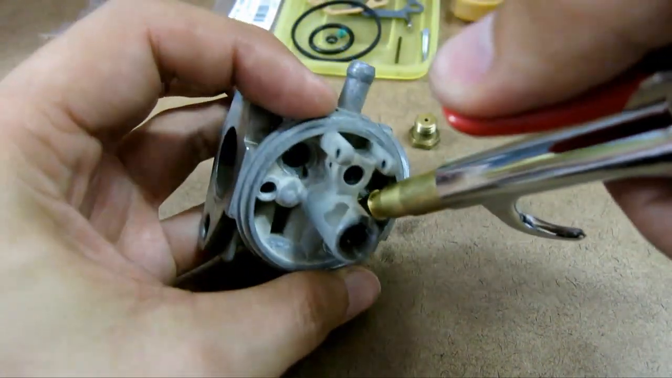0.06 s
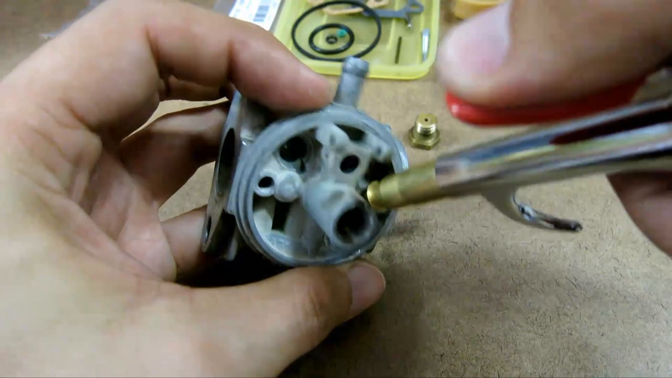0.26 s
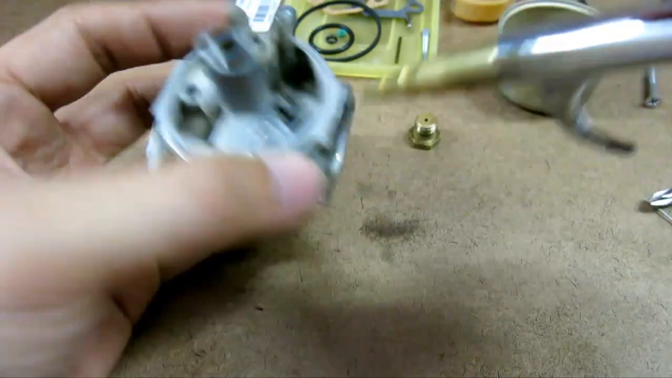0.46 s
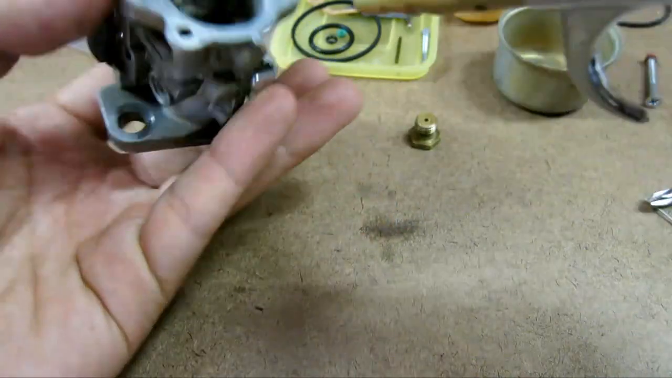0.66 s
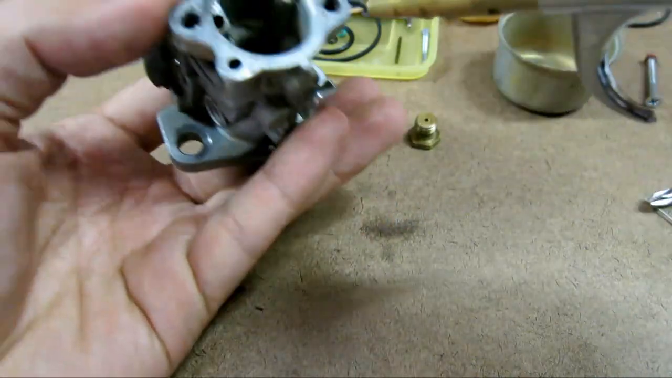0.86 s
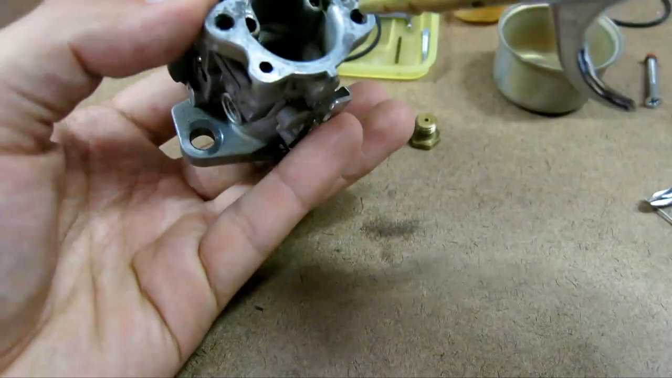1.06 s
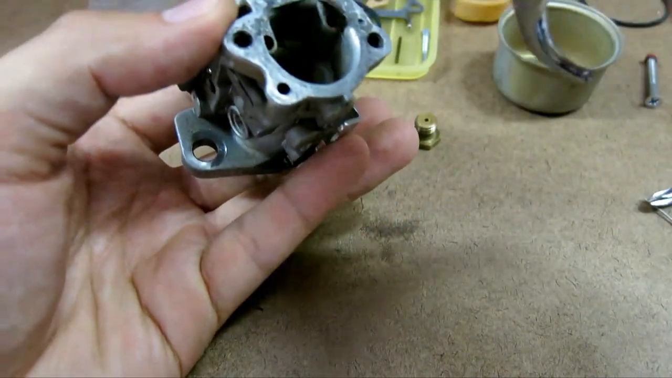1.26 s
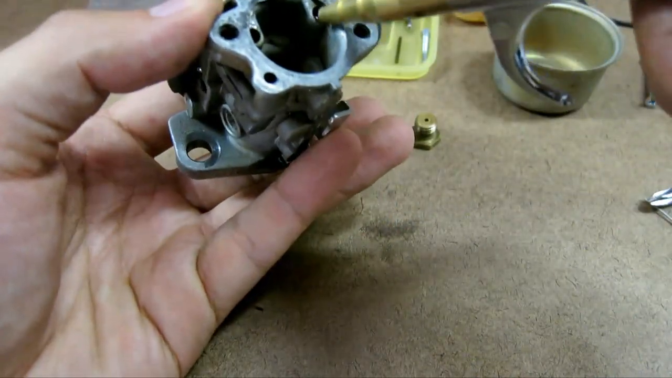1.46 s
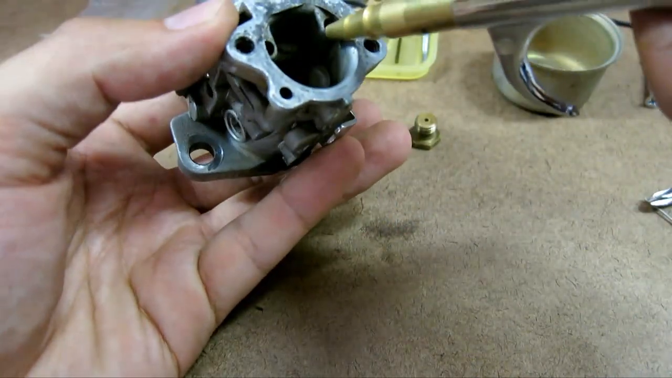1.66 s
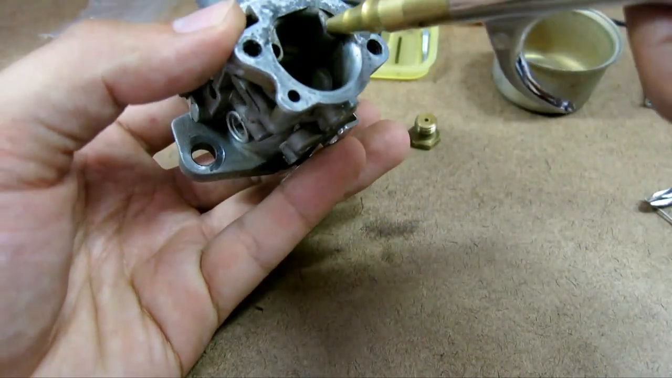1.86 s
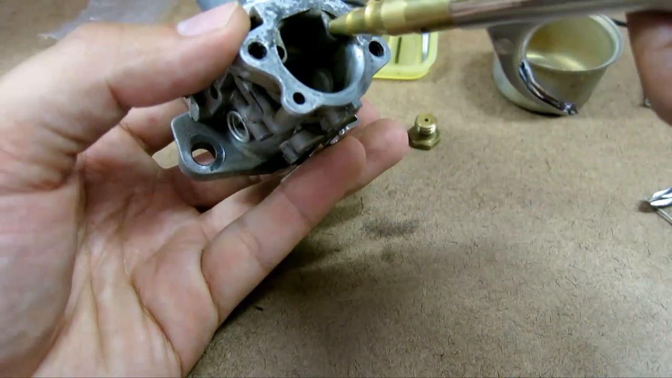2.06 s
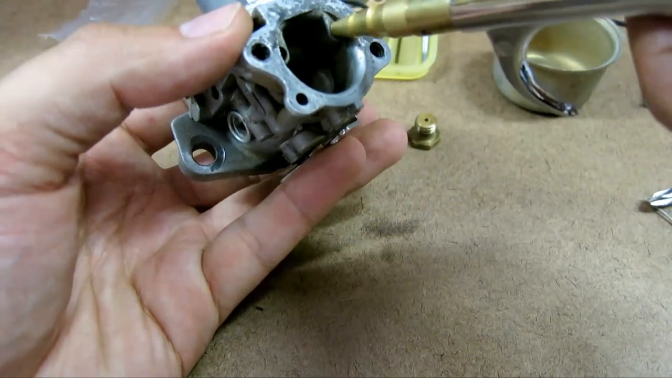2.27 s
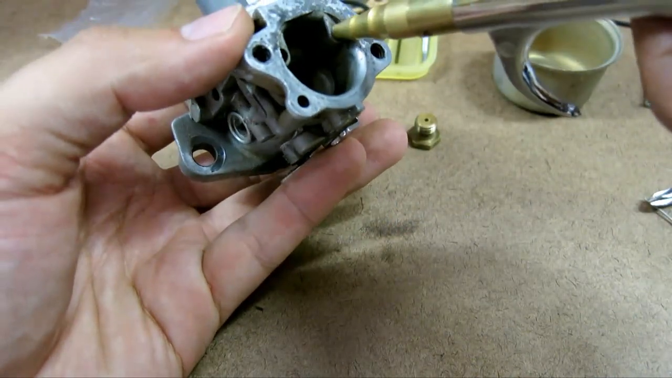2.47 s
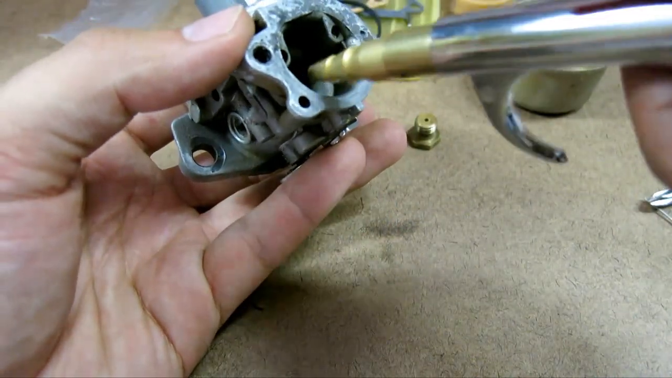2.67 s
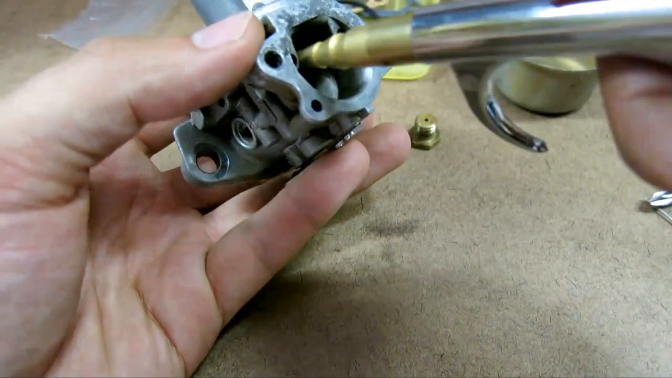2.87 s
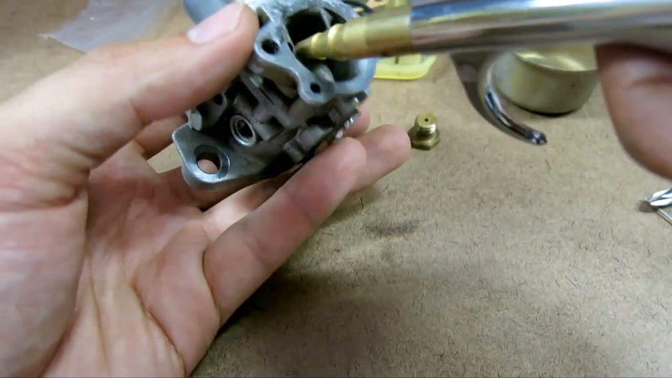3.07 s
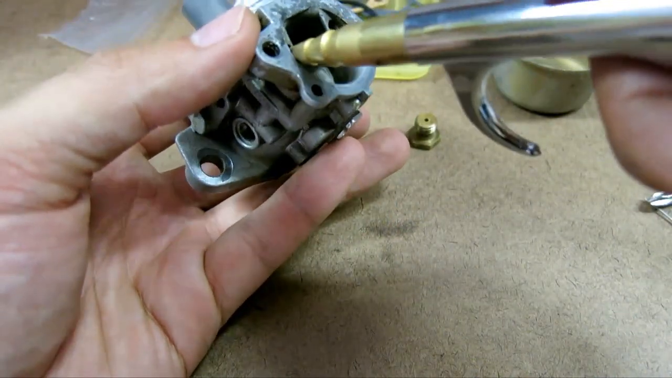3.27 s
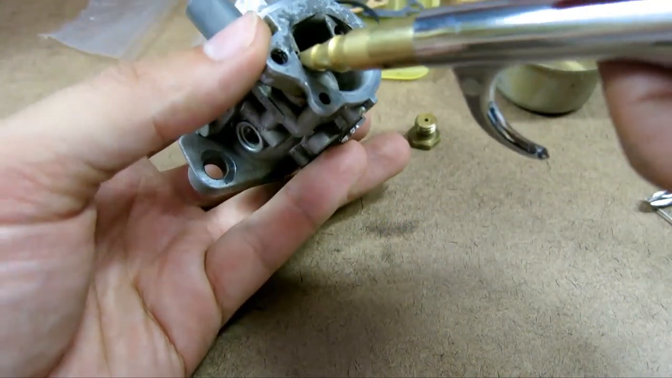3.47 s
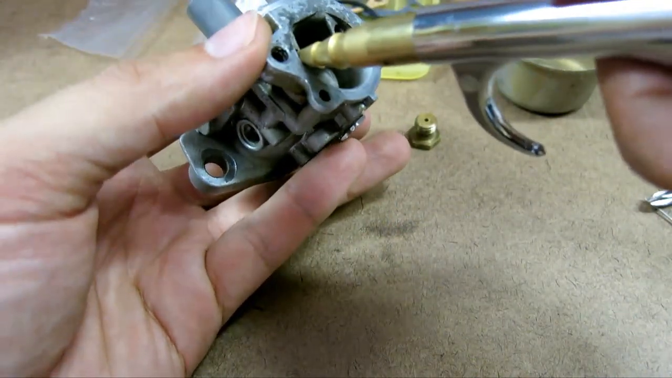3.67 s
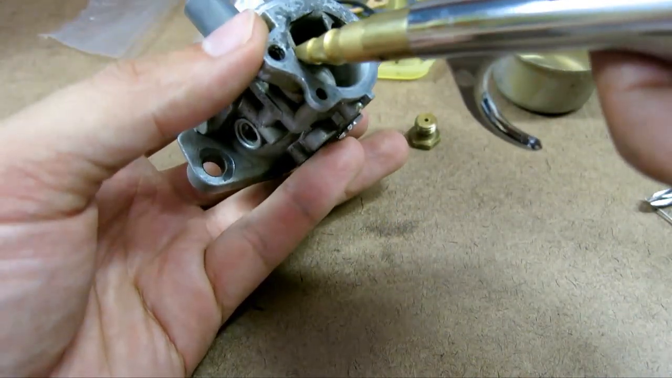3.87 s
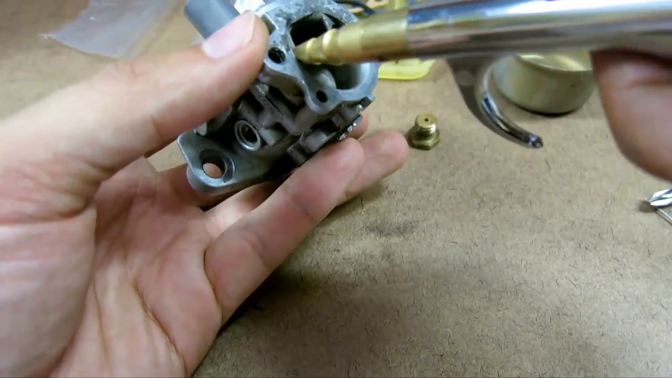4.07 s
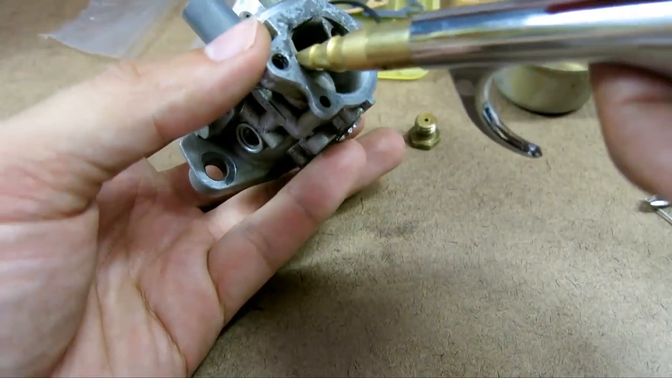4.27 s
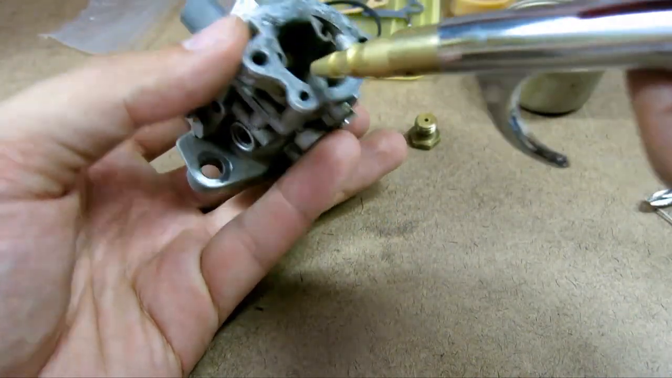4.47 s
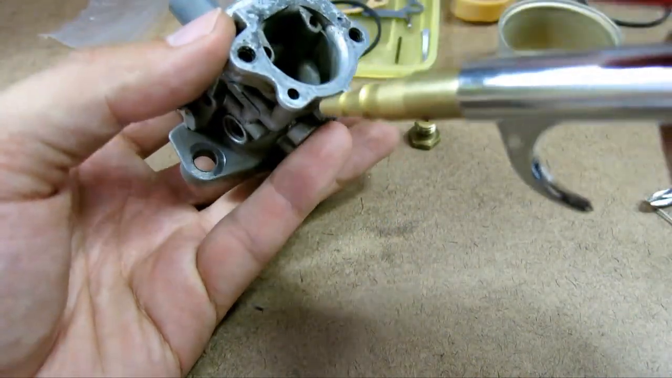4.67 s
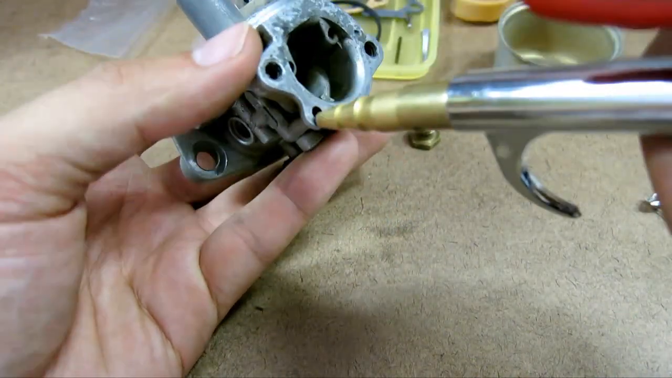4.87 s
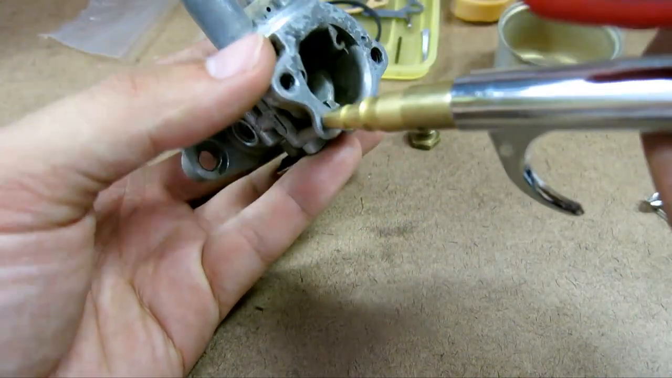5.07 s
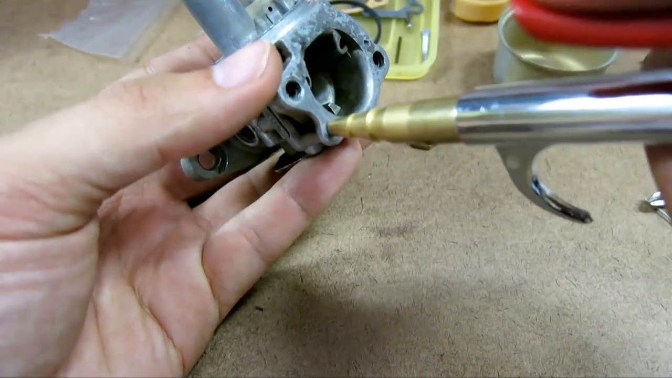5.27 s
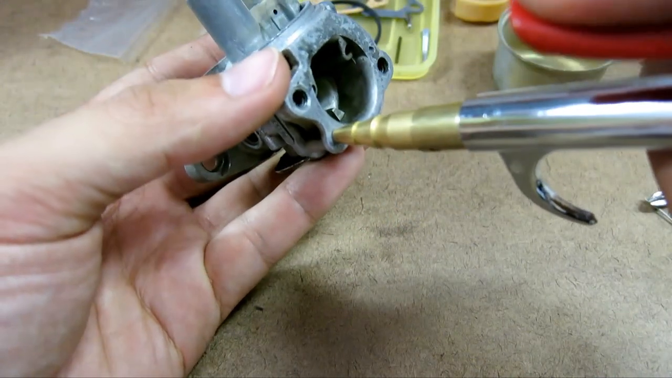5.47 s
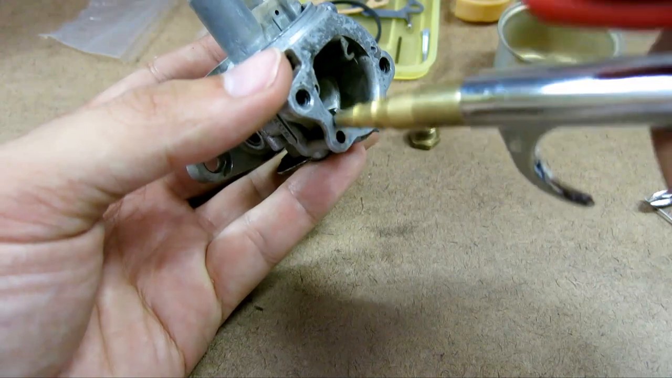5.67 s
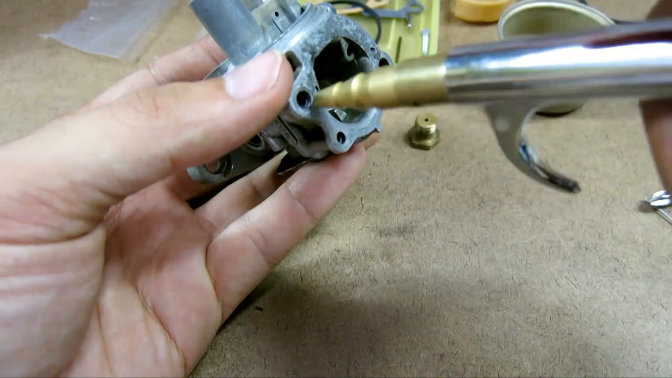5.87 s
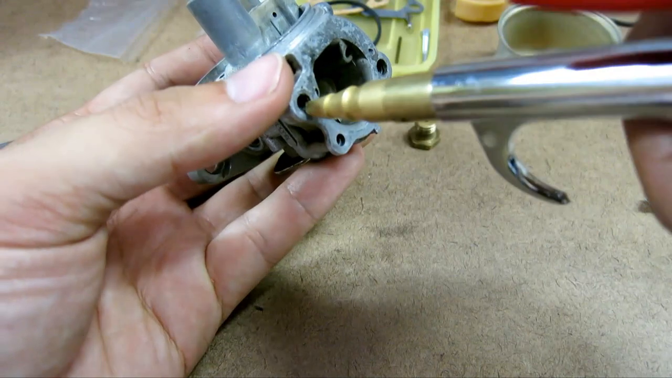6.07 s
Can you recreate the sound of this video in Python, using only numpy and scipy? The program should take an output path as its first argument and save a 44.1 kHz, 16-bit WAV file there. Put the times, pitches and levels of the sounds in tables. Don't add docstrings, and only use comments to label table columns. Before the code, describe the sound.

Bright, forceful air hisses come in brief groups: one, two faint, four quick, three hard, then a final pair. Each swells and cuts off within about a tenth of a second, thin and whistling at low flow, broad and rough at full flow, with a short room tail. Between them a brass tip clicks, rings and scrapes on a small metal casting, close up. Faint hum and room air lie beneath.

```python
import sys
import numpy as np
from scipy import signal
from scipy.fft import rfft, irfft, next_fast_len
from scipy.io import wavfile
from scipy.ndimage import uniform_filter1d, map_coordinates

SR = 44100
rng = np.random.default_rng(int(sys.argv[2]) if len(sys.argv) > 2 else 0)


def persist_wave(psi):
    counts = np.round(np.clip(psi, -1, 1) * 32767).astype(np.int16)
    wavfile.write(sys.argv[1], SR, np.atleast_2d(counts).T)


def boost_factor(decibels):
    exponent = np.asarray(decibels, float) / 20
    return 10 ** exponent


N = 269892
T = np.arange(N) / SR
HIT_T = np.arange(SR // 6) / SR

# frequency in Hz, side minus mid in dB.
WIDTH = [(300, -19), (2000, -18), (4000, -24.5), (8500, -24), (10000, -15), (13000, -13), (15500, -10)]
# frequency in Hz, level in dB, T60 in seconds.
CASTING = [(8705, -19, 0.076), (9356, -14, 0.052), (9846, -24, 0.078), (10100, -14, 0.11),
           (10730, -3, 0.068), (11080, 0, 0.082), (12860, -5, 0.092), (13640, -34, 0.13),
           (14390, -18, 0.092), (15020, -17, 0.078), (15670, -19, 0.11)]
# frequency in Hz, level in dB.
CRACK = [(800, -2.5), (1800, -4), (3000, 3.5), (5000, -4), (7000, 2), (11000, -9), (13500, -11.5),
         (16000, -22)]


def unit(x):
    return x / np.sqrt(np.mean(x ** 2) + 1e-20)


def along(points, hz):
    f, v = np.transpose(points)
    return np.interp(np.log(hz + 1), np.log(f + 1), v)


def curve(points):
    return lambda hz: boost_factor(along(points, hz))


def peaks(modes, hz):
    power = 0
    for centre, width, db in modes:
        damped = (hz * width) ** 2
        power = power + boost_factor(db) ** 2 * damped / ((centre * centre - hz * hz) ** 2 + damped)
    return np.sqrt(power)


def steep(modes, hz, order=2):
    return np.sqrt(sum(boost_factor(db) ** 2 * peaks([(c, w, 0)], hz) ** (2 * order) for c, w, db in modes))


def filtered(x, gain):
    m = next_fast_len(x.shape[-1] + 8192)
    return irfft(rfft(x, m) * gain(np.fft.rfftfreq(m, 1 / SR)), m)[..., :x.shape[-1]]


def noise(gain, count=N):
    return unit(filtered(rng.standard_normal(count), gain))


def wobble(rate):
    return map_coordinates(rng.standard_normal(int(N * rate / SR) + 4), [T * rate])


def gate(start, end, slope_db):
    outside_s = np.clip(np.maximum(start - T, T - end), 0, None)
    return boost_factor(-slope_db * outside_s)


def gain_control():
    # time in seconds, room level in dB.
    pulls = [
        (0, -68),
        (0.22, -76.5),
        (2.41, -72),
        (3.59, -73.5),
        (3.81, -74),
        (4.06, -75.5),
        (5.59, -76.5),
    ]
    recover_db_per_s, duck_s = 5.5, 0.06
    s, db = np.transpose(pulls)
    last = np.maximum(np.searchsorted(s, T) - 1, 0)
    level_db = db[last] + recover_db_per_s * (T - s[last])
    return boost_factor(uniform_filter1d(level_db, round(duck_s * SR)))


def workshop():
    # frequency in Hz, width in Hz, level in dB.
    machine_modes = [(58.7, 20, -6), (122, 27, -3.5), (155, 21, -4.5), (211, 19, -6.5), (345.9, 5.1, -11)]
    # frequency in Hz, level in dB.
    mains_lines = [(119.5, 3.5), (155.5, -2), (646, -8)]
    # frequency in Hz, level in dB per Hz.
    air_mid = [(25, -35), (43, -17.5), (123, -13.5), (217, -12), (340, -17), (775, -22.5), (1500, -28),
               (3500, -41.5), (5000, -40), (7000, -40), (8000, -38.5), (9000, -42.5), (12000, -44.5),
               (12800, -63.5), (14000, -87)]
    # frequency in Hz, level in dB per Hz.
    air_side = [(25, -22.5), (64, -5), (300, -6.5), (800, -12.5), (1650, -20), (3000, -37.5), (6000, -48.5),
                (12000, -59), (13500, -89.5)]
    mid = boost_factor(1) * noise(curve(air_mid))
    mid += boost_factor(2) * noise(lambda hz: steep(machine_modes, hz))
    for hz, db in mains_lines:
        drift = 0.7 * wobble(5)
        mid += boost_factor(db + 1.2 * wobble(4.3)) * np.sin(2 * np.pi * hz * T + drift)
    side = boost_factor(9.5) * noise(curve(air_side))
    return gain_control() * np.array([mid, side])


def valve(t, squeezes, surge_db):
    open_power, shut_power = 2.6, 2.8
    surge_s = 0.016
    choke_at_db, choke_db = -28.8, 3.8

    def travel(start, end):
        return np.clip((t - start) / (end - start), 1 / 100, 1)

    power, surge = 0, 0
    for crack, wide, let_go, shut, db in squeezes:
        pressure = boost_factor(db) * travel(crack, wide) ** open_power * travel(shut, let_go) ** shut_power
        power = power + pressure ** 2
        surge = surge + surge_db * np.exp(-abs(t - wide) / surge_s)
    flow_db = 10 * np.log10(power)
    return flow_db + choke_db * (1 + np.tanh(flow_db - choke_at_db)) / 2, surge


def halves(x):
    def level(lo, hi):
        return filtered(x[0], lambda hz: 1.0 * (hz > lo) * (hz < hi)).std()

    lower = filtered(x, lambda hz: 1 / (1 + (hz / 8600) ** 10))
    return np.array([lower / level(3500, 8000), (x - lower) / level(9000, 16000)])


def low_pass(cutoff):
    return lambda hz: 1 / (1 + (hz / cutoff) ** 4)


def jet():
    # valve cracks, fully open,
    # let go and shut in seconds, hiss level in dB.
    trigger = [
        [(0.083, 0.146, 0.253, 0.288, -26)],
        [(1.657, 1.709, 1.753, 1.801, -53), (1.723, 1.745, 1.79, 1.836, -32.5)],
        [(1.928, 2.008, 2.045, 2.118, -28.7), (2.129, 2.16, 2.269, 2.307, -33.9),
         (2.111, 2.201, 2.238, 2.26, -30.5), (2.31, 2.363, 2.43, 2.479, -23.8)],
        [(3.488, 3.532, 3.598, 3.674, -23.5), (3.718, 3.784, 3.828, 3.913, -23.7),
         (3.928, 4.005, 4.08, 4.147, -23.3)],
        [(5.291, 5.339, 5.392, 5.48, -28.4)],
        [(5.483, 5.545, 5.619, 5.668, -23.6)],
    ]
    # frequency in Hz, width in Hz, level in dB.
    cavities = [
        [(2400, 2500, -7.5), (5340, 2500, -3.5), (8700, 2300, 0.5), (10900, 3000, -7), (14200, 3000, -5)],
        [(690, 1500, -27), (2460, 900, -10.5), (5060, 410, -13), (6020, 710, -11.5), (10030, 520, 10.5),
         (13040, 2000, 5), (15400, 900, -4)],
        [(700, 1000, -21), (2490, 1900, -12.5), (5070, 2000, -8.5), (7500, 1700, -5), (9990, 1500, -5.5),
         (12340, 3000, 0.5), (15290, 1300, -4)],
        [(729, 1500, -30), (2530, 2000, -19), (5220, 1640, -9.5), (7600, 5600, -12.5), (10800, 1200, 1.5),
         (13160, 1500, -2.5), (14700, 1600, -6)],
        [(620, 580, -22), (3300, 3900, -13), (5040, 2800, -6.5), (7500, 2600, -6), (10300, 2200, -13),
         (12300, 1200, 4), (15240, 1180, -5)],
        [(1500, 3600, -20), (3300, 1050, -13), (4770, 2700, -4.5), (7750, 4300, 1.5), (11140, 1500, 1.5),
         (12660, 2200, 3.5), (15060, 2400, -2.5)],
    ]
    # room send in dB, level where half turbulent in dB,
    # lower hiss in dB, opening surge in dB, pipe stretch as a ratio.
    seats = [
        (-13, -25.5, -5, 2.9, 1.0),
        (-29, -62.5, -10.5, -2.5, 1.01),
        (-27, -23, -9, 0.6, 1.0),
        (-25.5, -32, -11.5, 1.4, 1.045),
        (-23, -63, -4, -1.8, 1.015),
        (-19.5, -38, -7, 1.2, 1.03),
    ]
    # frequency in Hz, width in Hz, level in dB.
    pipe = [(600, 1400, -28), (2454, 1800, -9.5), (5080, 1200, -4.5), (5860, 1600, -7.5),
            (7600, 1400, -7.5), (10054, 1400, -0.5), (12070, 1100, -2.5), (12900, 920, 1),
            (15600, 1000, -7.5)]
    # time in seconds, lift in dB.
    squeals = [(1.815, 5), (1.986, 8.5), (2.069, 9.5), (2.154, 4.5), (2.339, 7), (2.452, 4), (3.54, 4.5),
               (3.753, 7), (3.784, 4), (3.865, 5), (3.965, 5), (5.32, 3), (5.354, 3.5), (5.422, 6),
               (5.513, 3), (5.541, 3)]
    # frequency in Hz, level in dB per Hz.
    far_colour = [(300, -32), (1500, -22), (3800, -16.5), (4800, -5), (8000, -4), (11000, -1.5),
                  (14000, -6), (16000, -8)]
    squeal_s, turbulence_lag_s = 0.004, 0.018
    sing_at_db, sing_range_db, sing_db = -42, 3.7, 2.4
    lower_surge, lower_lingers = 2.9, 0.09
    bass_lingers, bass_hz = 0.22, 2300

    out, send = np.zeros((2, N)), np.zeros(N)
    squeal_db = sum(db * np.exp(-((T - s) / squeal_s) ** 2) for s, db in squeals)
    for squeezes, cavity, seat in zip(trigger, cavities, seats):
        send_db, full_db, lower_db, surge_db, stretch = seat
        span = slice(round(squeezes[0][0] * SR), round(squeezes[-1][3] * SR))
        t = T[span]
        flow_db, surge = valve(t, squeezes, surge_db)
        singing = sing_db * np.exp(-((flow_db - sing_at_db) / sing_range_db) ** 2)
        level_db = flow_db + surge + singing + squeal_db[span]

        settled_db = np.minimum(level_db, np.interp(t - turbulence_lag_s, t, level_db))
        full = 1 / (1 + np.exp(-(settled_db - full_db) / 2.2))
        white = rng.standard_normal((2, 2, len(level_db)))
        sung = halves(filtered(white[0], lambda hz: steep(pipe, hz / stretch, order=3)))
        blown = halves(filtered(white[1], lambda hz: steep(cavity, hz)))
        lower, upper = np.sqrt(1 - full) * sung + np.sqrt(full) * blown

        shy_db = np.minimum(flow_db.max() - flow_db, 40)
        bass_gain = boost_factor(bass_lingers * shy_db - lower_surge * surge)
        lower += filtered(lower, low_pass(bass_hz)) * (bass_gain - 1)
        below_db = flow_db + lower_db + lower_surge * surge + lower_lingers * shy_db
        out[:, span] += boost_factor(level_db) * upper + boost_factor(below_db) * lower
        send[span] += boost_factor(level_db + send_db)

    out *= boost_factor(0.68 * wobble(60) + 0.92 * wobble(300))
    gurgle = filtered(out[0], low_pass(1500))
    out[0] += gurgle * (boost_factor(4.5 * wobble(45)) - 1)
    lean = filtered(out[0], lambda hz: (0.17 + 0.33j) * hz ** 8 / (hz ** 8 + 9000 ** 8))
    side = lean + filtered(out[1], curve(WIDTH))
    return np.array([out[0], side]), send * noise(curve(far_colour))


def walls(x):
    # frequency in Hz, T60 in seconds.
    decay = [(300, 0.37), (2000, 0.58), (5000, .42), (10000, 0.4), (16000, 0.25)]
    hz, t, z = signal.stft(rng.standard_normal((2, SR // 2)), SR, nperseg=256)
    fading = z * boost_factor(-60 * t / along(decay, hz)[:, None])
    tail = signal.istft(fading, SR, nperseg=256)[1]
    wet = signal.fftconvolve(x[None], tail / np.linalg.norm(tail[0]), axes=1)[:, :N]
    return np.array([wet[0], filtered(wet[1], lambda f: boost_factor(along(WIDTH, f) + 7))])


def draught():
    # start and end in seconds, level in dB, lump depth in dB, # mid level
    # relative to side in dB.
    gusts = [
        (0.163, 0.241, -11.5, 1.5, -14),
        (2.38, 2.427, -39, 6, -6.5),
        (3.551, 3.584, -31, 3, -21.5),
        (3.786, 3.832, -39.5, 2, -22.5),
        (4.019, 4.01, -26, -2, -4.5),
        (4.016, 4.072, -31.5, 4, -9),
        (5.566, 5.613, -22.5, 2, -15.5),
    ]
    # frequency in Hz, level in dB per Hz.
    eddy_colour = [(18, -45), (30, -7), (336, 1.5), (512, -1), (625, -3.5), (714, -4), (1020, -2),
                   (2160, -9.5), (3150, -23), (6000, -30.5), (7800, -61), (13200, -120)]
    push = curve(eddy_colour)
    lumps, out = wobble(70), 0
    shared = noise(lambda hz: push(hz) * (1 + hz / 2500) * hz / (hz + 60))
    opposed = noise(push)
    slow = noise(lambda hz: push(hz) / (1 + (hz / 200) ** 2))
    for start, end, db, lump_db, shared_db in gusts:
        eddies = gate(start, end, slope_db=1502.5) * np.array([boost_factor(shared_db) * shared, opposed])
        wake = boost_factor(-29.5) * (T > end) * gate(start, end, slope_db=250) * slow * [[0.4], [1]]
        out = out + boost_factor(db + lump_db * lumps) * (eddies + wake)
    return out


def burst(gain, t60, rise):
    return noise(gain, count=len(HIT_T)) * boost_factor(-60 * HIT_T / t60) * (1 - np.exp(-HIT_T / rise))


def add(out, s, mid, other, pan_db):
    side = np.tanh(pan_db * np.log(10) / 40) * mid + other
    out[:, round(s * SR):][:, :len(mid)] += [mid, side]


def knocks(out):
    # time in seconds, peak level in dB.
    bumps = [
        (0.554, -62),
        (0.629, -51),
        (0.647, -51.5),
        (1.046, -55.5),
        (4.565, -62),
    ]
    # frequency in Hz, width in Hz, level in dB.
    hollow = [(463, 200, -4.5), (835, 200, 0), (1368, 170, -1.5), (2150, 270, -14)]
    for s, db in bumps:
        mid, other = (burst(lambda f: steep(hollow, f), t60=0.072, rise=0.0012) for _ in range(2))
        add(out, s, boost_factor(db - 1.5) * mid, boost_factor(db - 1) * other, pan_db=-12.5)


def scrapes():
    # start and end in seconds, level in dB, centre frequency in Hz.
    slides = [
        (0.555, .576, -73, 12000),
        (2.92, 2.944, -74, 3500),
        (3.033, 3.048, -70, 3300),
        (3.052, 3.083, -63, 2740),
        (3.103, 3.121, -72, 3300),
        (5.166, 5.175, -68.5, 4000),
        (1.425, 1.447, -74.5, 3500),
        (1.936, 1.935, -57, 3000),
    ]
    out, grain = np.zeros(N), boost_factor(5 * np.tanh(wobble(370)) / 2)
    metal = [(c, 120, 0) for c, *_ in CASTING]
    for start, end, db, hz in slides:
        span = slice(round((start - 0.03) * SR), round((end + 0.036) * SR))
        friction = noise(lambda f: peaks([(hz, 1.3 * hz, 0)], f) ** 3 + boost_factor(-11) * steep(metal, f),
                         count=len(out[span]))
        out[span] += boost_factor(db) * gate(start, end, slope_db=2500)[span] * friction
    return out * grain


def ring(struck_hz, upper_db, damping):
    out = 0
    for hz, db, t60 in CASTING:
        favour_db = 6 * (abs(hz - struck_hz) < 200) + upper_db * (hz > 12200)
        level_db = 0.68 * db + favour_db + rng.normal(0, 2)
        out = out + boost_factor(level_db - 60 * HIT_T * damping / t60) * np.sin(2 * np.pi * hz * HIT_T)
    return out


def taps(out):
    # time in seconds, peak level in dB, ring relative to it in dB,
    # favoured mode in Hz, upper modes relative in dB.
    strikes = [(1.3473, -42, -20.5, 9370, -29), (1.3843, -40, -17.5, 10600, -24),
               (1.5273, -30, -19, 9960, -28), (1.5998, -41.5, -11, 11100, -23),
               (2.5281, -35, -1, 11230, -8), (2.9082, -40, -7, 11160, -26), (3.0989, -53, -24, 10100, -25),
               (3.1834, -40, -10, 11370, -17), (3.263, -36.5, -15.5, 10100, -25),
               (4.8237, -42.5, -13, 10000, -28), (4.9594, -64.5, -11, 13400, -15.5),
               (5.0733, -49.5, -15, 8520, -33), (5.1991, -48.5, -16, 10800, -27)]
    crack = curve(CRACK)
    for s, db, ring_db, hz, upper_db in strikes:
        dull = np.clip(ring_db / -4.5, 0.3, 1)
        damping = 1.0 + 0.026 * abs(ring_db + 4)

        def strike():
            hit = burst(lambda f: crack(f) * f / (f + 1 + 7000 * (1 - dull)), t60=0.012 * dull, rise=0.00022)
            ringing = boost_factor(1.88 * ring_db + 4.5) * ring(hz, upper_db - ring_db + 8, damping)
            return hit * boost_factor(-7) * np.sqrt(dull) + ringing

        mid, other = strike(), strike()
        add(out, s, boost_factor(db) * mid, boost_factor(db - 12) * other, pan_db=-0.2)


def ticks(out):
    # time in seconds, peak level in dB, colour in Hz, sharpness in dB.
    grit = [(1.3594, -48, 4190, -20), (1.3788, -47.5, 7100, -16), (1.3922, -45, 4200, -29),
            (1.396, -43, 7300, -13), (1.4025, -27.5, 6160, -22), (1.481, -50, 2050, -24),
            (1.8694, -49, 2790, -22), (4.31, -58, 2240, -17), (4.407, -46, 8000, -8),
            (4.4174, -26.5, 8300, -28.5), (4.817, -41.5, 2900, -12), (5.0294, -59, 3360, -19),
            (5.088, -49, 4900, -18), (5.1174, -64, 2000, -17.5), (5.143, -53, 3100, -24.5),
            (5.9907, -41, 8730, -15.5), (6.0163, -58, 3070, -18), (6.0327, -48, 3280, -17)]
    crack = curve(CRACK)
    for s, db, hz, sharp_db in grit:
        colour = lambda f: crack(f) * boost_factor(sharp_db + 15.5) + steep([(hz, 0.53 * hz, 0)], f)
        mid, other = (burst(colour, t60=0.013, rise=0.00067) for _ in range(2))
        add(out, s, boost_factor(db - 5.5) * mid, boost_factor(db - 17) * other, pan_db=-0.6)


def handling():
    out = np.zeros((2, N + SR))
    knocks(out)
    out[0, :N] += scrapes()
    taps(out)
    ticks(out)
    return out[:, :N]


def scene():
    hiss, send = jet()
    hands = handling()
    room = walls(send + boost_factor(-27) * hands[0])
    mid, side = hiss + hands + room + draught() + workshop()
    return np.array([mid + side, mid - side])


def top_cut(x):
    return signal.sosfilt(signal.butter(12, 16640, fs=SR, output="sos"), x)


def record(dry):
    soft = dry / (1 + np.abs(dry / 0.46) ** 5) ** (1 / 5)
    mix = filtered(soft, lambda hz: boost_factor(-45) + 1 / (1 + (hz / 15800) ** 200))
    return top_cut(mix)


dry = scene()
out = record(dry)
persist_wave(out)
```